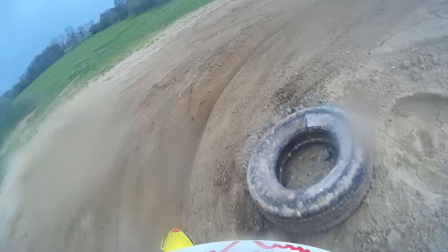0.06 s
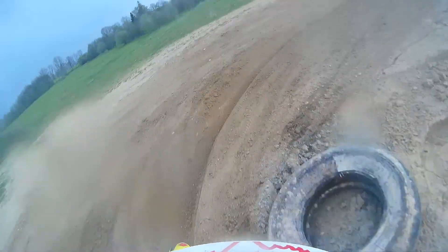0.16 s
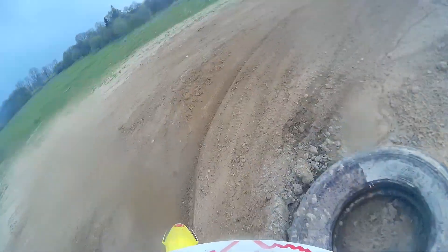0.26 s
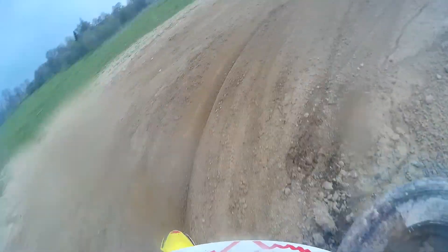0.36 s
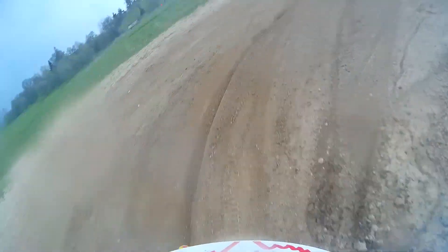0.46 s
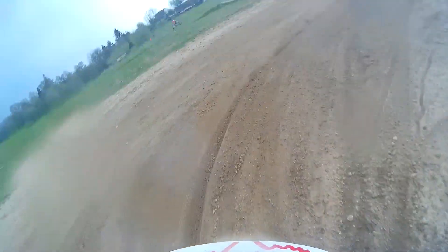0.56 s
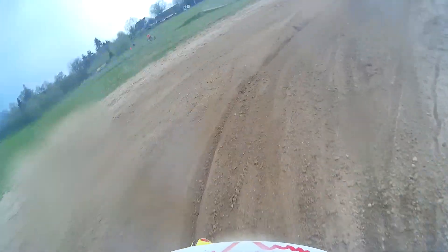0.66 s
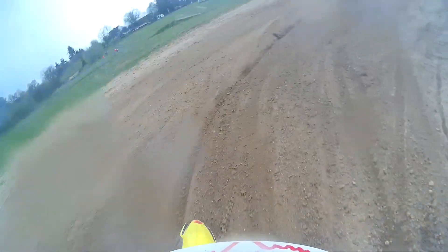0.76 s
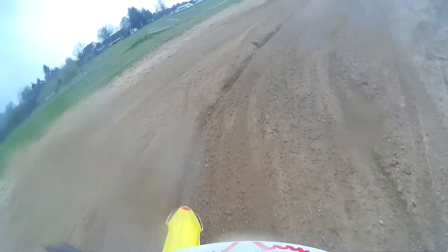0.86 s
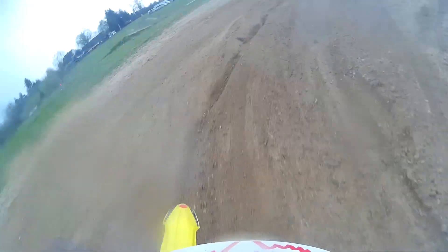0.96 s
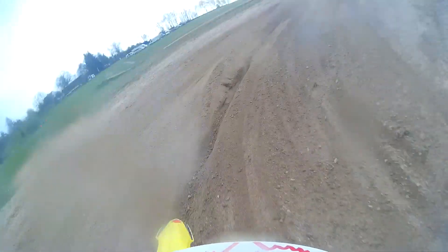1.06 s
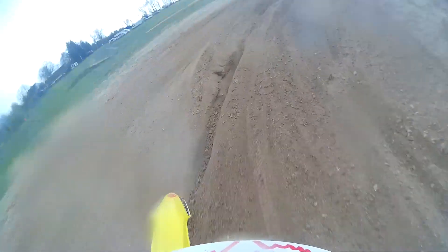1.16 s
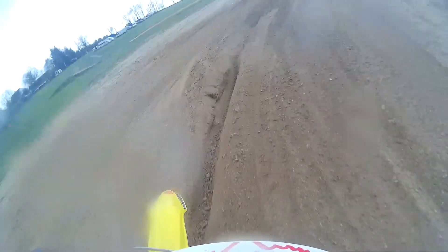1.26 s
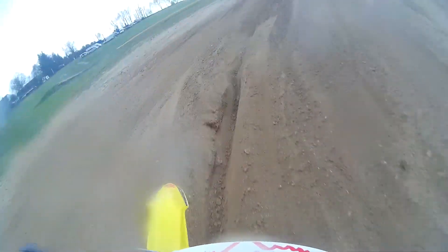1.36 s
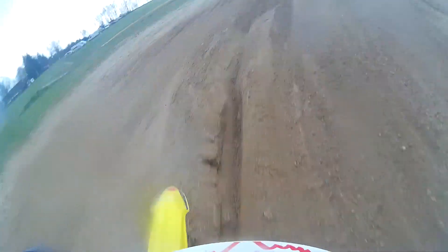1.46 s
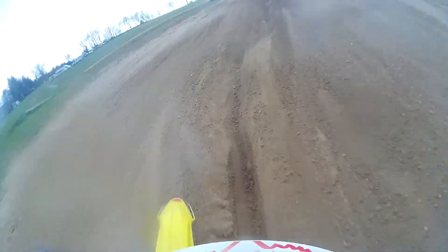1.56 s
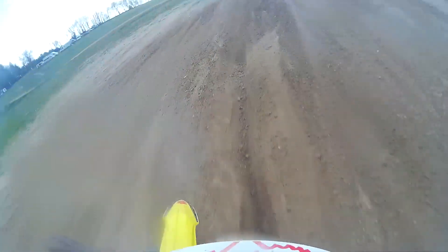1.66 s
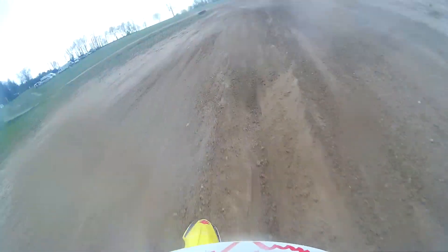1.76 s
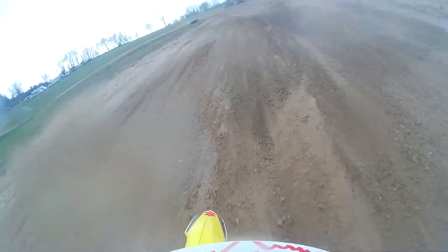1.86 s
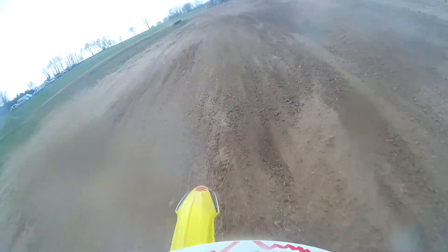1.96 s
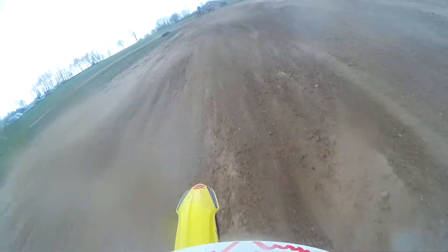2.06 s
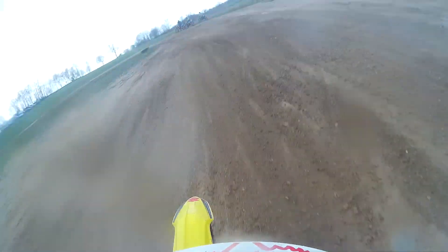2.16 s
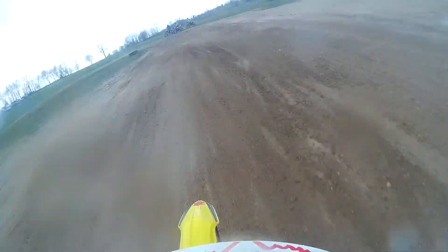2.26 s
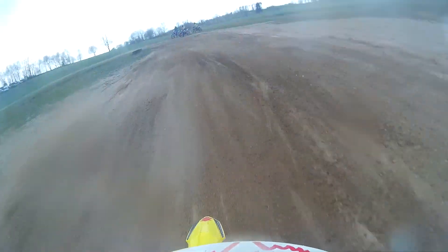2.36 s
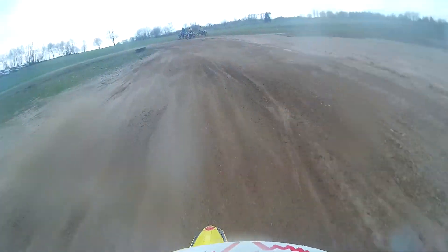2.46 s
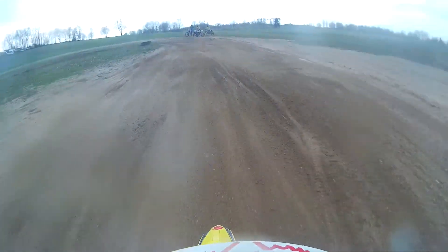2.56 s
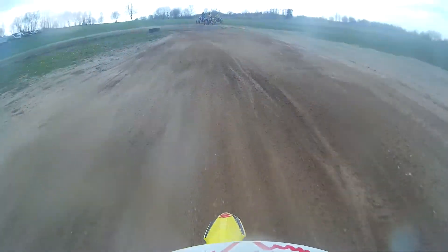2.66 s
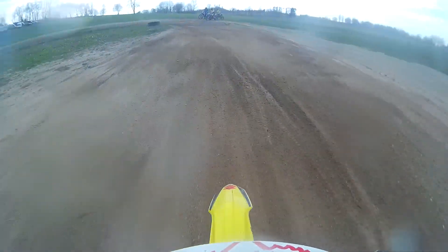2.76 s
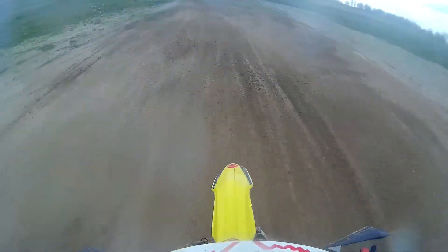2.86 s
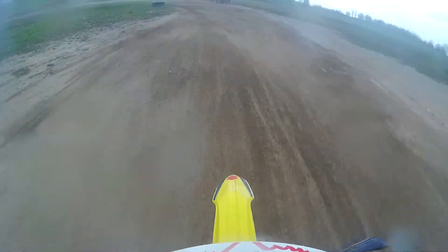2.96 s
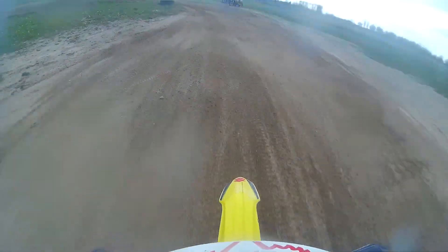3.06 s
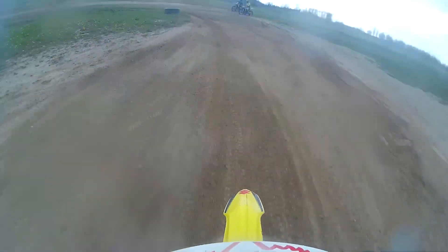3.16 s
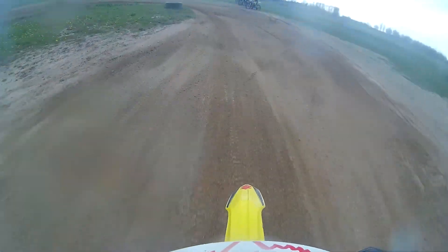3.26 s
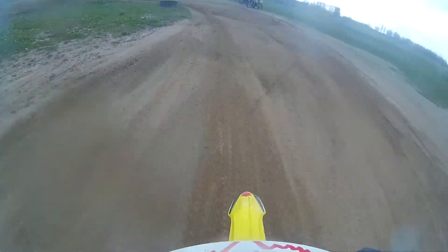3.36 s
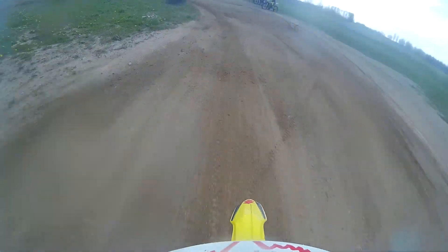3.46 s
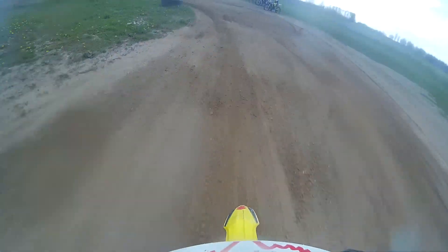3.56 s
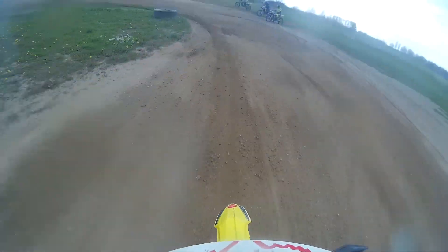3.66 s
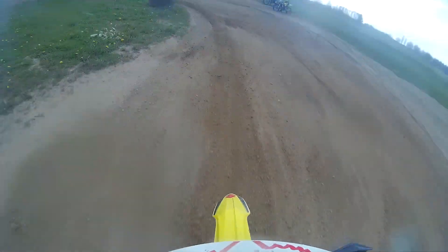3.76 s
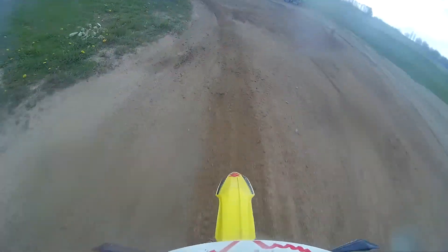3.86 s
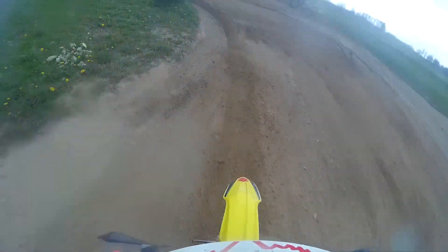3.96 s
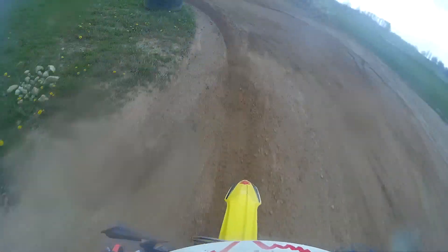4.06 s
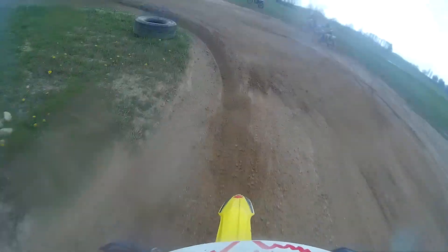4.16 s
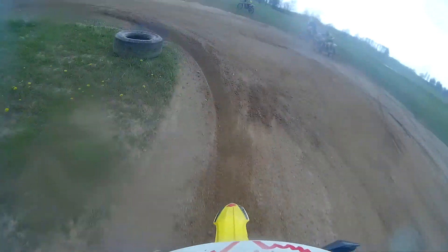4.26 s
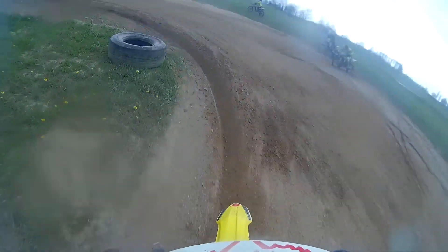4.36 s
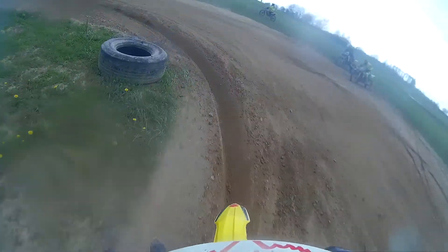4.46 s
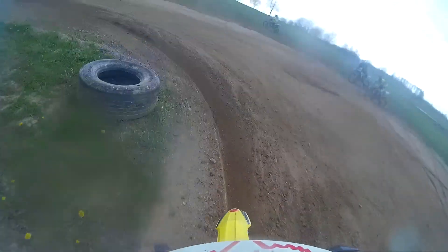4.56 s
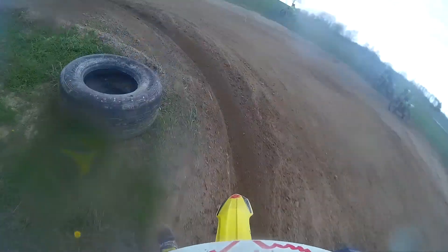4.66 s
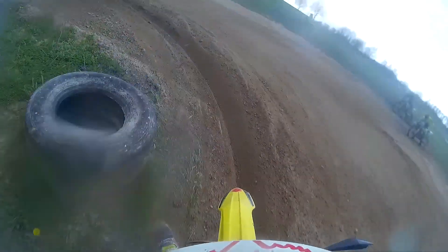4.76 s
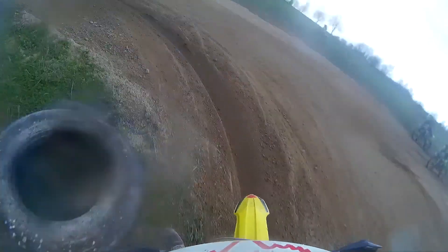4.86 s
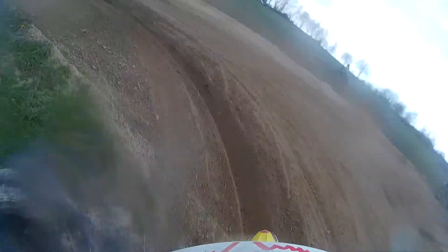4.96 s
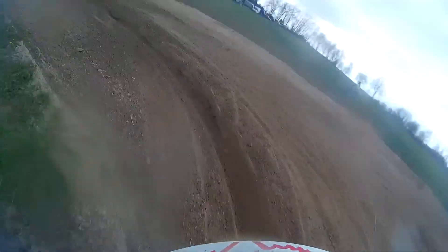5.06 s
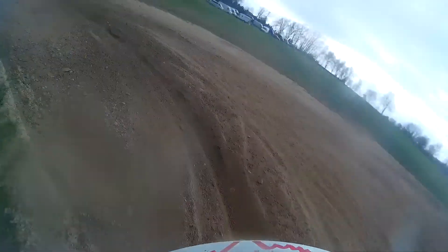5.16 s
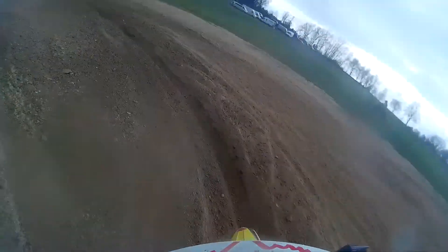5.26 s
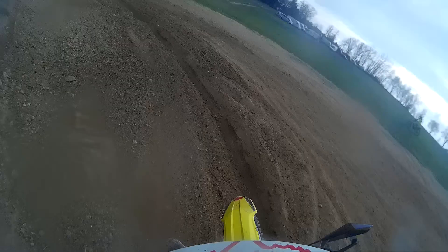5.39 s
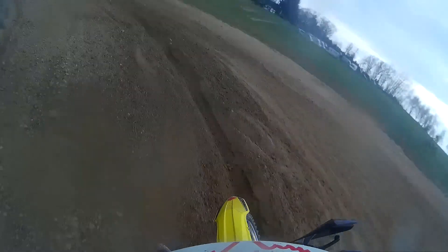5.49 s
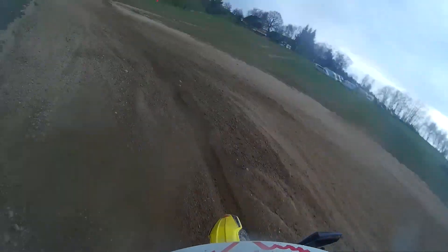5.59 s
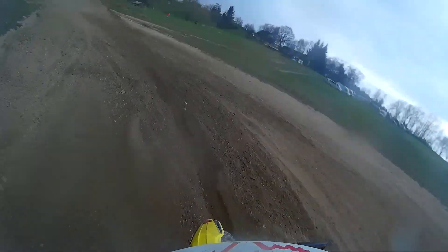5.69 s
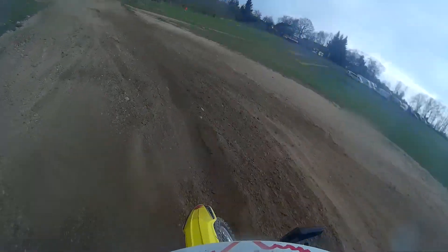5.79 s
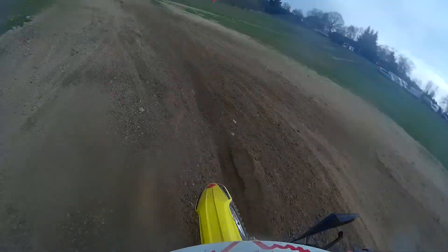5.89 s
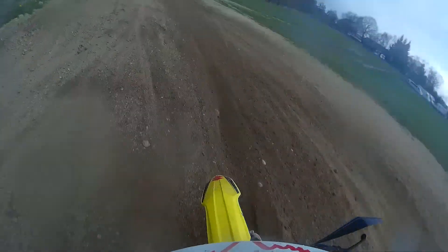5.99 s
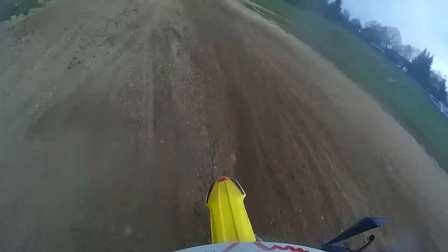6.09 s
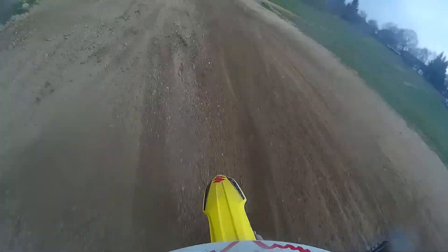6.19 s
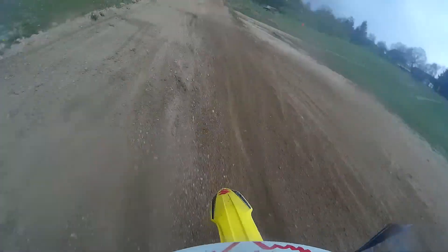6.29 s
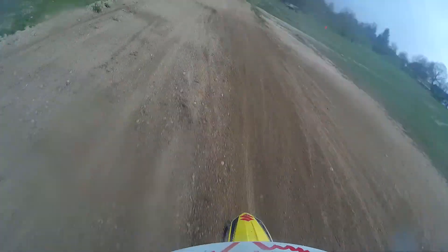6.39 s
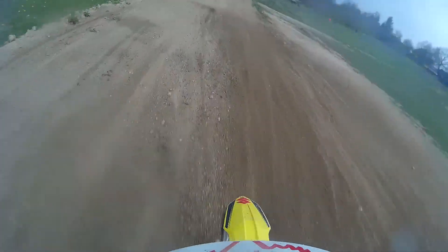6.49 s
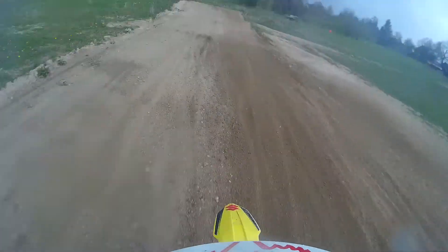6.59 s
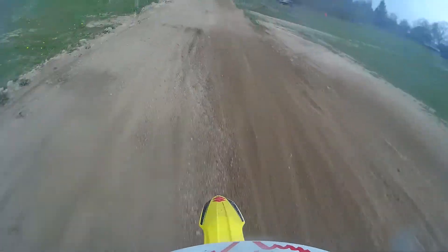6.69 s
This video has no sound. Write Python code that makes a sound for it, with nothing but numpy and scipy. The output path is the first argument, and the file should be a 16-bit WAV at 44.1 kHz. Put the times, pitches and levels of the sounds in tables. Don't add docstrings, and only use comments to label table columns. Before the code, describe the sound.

Close onboard sound of a single-cylinder four-stroke dirt bike on a dirt track, heard through a sealed camera case on the helmet. Quiet uneven putting leaps into a coarse, nasal bark with low boom and valve rattle. Ruts knock the mount. Midway the throttle shuts and the engine slows to soft putts, then it barks open again and a hard landing slams near the end.

```python
import sys
import numpy as np
from scipy import signal
from scipy.fft import rfft, irfft
from scipy.io import wavfile
from scipy.ndimage import uniform_filter1d

SR = 44100
rng = np.random.default_rng(int(sys.argv[2]) if len(sys.argv) > 2 else 0)


def boost(x):
    u = np.asarray(x, float) / 20
    return 10 ** u


def store_pcm(level_fs):
    pcm = np.round(np.clip(level_fs, -1, 1) * 32767).astype(np.int16)
    wavfile.write(sys.argv[1], SR, np.atleast_2d(pcm).T)


N = 296793

# frequency in Hz, density in dB per Hz.
HISS_SPECTRUM = [(2000, 4), (4500, -3.5), (8000, -5), (11000, -5), (14000, -5.5), (15300, -7), (16200, -29)]
# frequency in Hz, level in dB.
WHINE_TONES = [(8624, -84.5), (8694, -90)]
# start in seconds, end in seconds.
CARD_WRITES = [(.53, .77), (1.76, 1.95), (2.53, 2.77), (3.53, 3.69), (3.88, 3.97), (4.53, 4.77),
               (5.53, 5.77), (6.55, 6.73)]
# centre in seconds, extra level in dB, half length in seconds.
WIND_GUSTS = [(.55, 11.5, 0.091), (1.02, 13.5, 0.38), (1.48, 24.5, 0.045), (2.15, 13, 0.063),
              (2.33, 14, 0.045), (2.95, 16, 0.039), (3.65, 19.5, 0.041), (3.81, 7, 0.031), (5.27, 5, 0.12),
              (5.53, 8, 0.078), (5.87, 9, 0.096), (6.08, 10, 0.051), (6.32, 23, 0.16), (6.55, 15.5, 0.089)]
# start in seconds, peak in dB, centre frequency in Hz.
GRIT_TICKS = [(1.4656, -40, 4870), (1.537, -34.5, 5600), (1.5844, -45, 4500), (1.8914, -41, 10700),
              (2.8883, -39, 5730), (3.415, -32.5, 10500), (3.5814, -40, 9470), (3.7314, -50, 1300),
              (3.746, -42, 5430), (3.864, -50, 5560), (3.8964, -44, 7060), (3.9265, -40, 4380),
              (4.925, -44.5, 4600), (6.2741, -20.5, 5140), (6.333, -34, 4500)]
# frequency in Hz, 60 dB decay time in seconds, level in dB.
MOUNT_MODES = [(283, 0.032, 11), (178, 0.0092, -57), (479, 0.023, 2), (806, 0.0085, -3.5)]
# start in seconds, peak in dB, sway below 80 Hz in dB, contact in ms.
MOUNT_KNOCKS = [(0.496, -37, -39.5, 0.69), (0.883, -18.5, -52, 1.6), (1.094, -31, -57, 3.8),
                (1.269, -24.5, -52, 2.1), (1.376, -23.5, -41, 1.7), (1.449, -19.5, -49, 0.79),
                (1.464, -26, -41, 1.8), (1.537, -13, -65, 0.22), (1.588, -26.5, -54, 1.7),
                (1.611, -19.5, -47, 1.6), (2.195, -20, -58, 0.47), (2.944, -28, -70, 1.9),
                (3.633, -21.5, -27, 1.15), (3.729, -29, -30, 0.4), (4.113, -39, -60, 3.3),
                (4.559, -30, -40, 1.5), (4.924, -19.5, -50, 1.04), (4.985, -30, -56, 3.5),
                (5.092, -31, -60, 2.5), (5.363, -39, -55, 3.7), (5.601, -31, -60, 3.0),
                (5.723, -21, -66, 0.53), (5.898, -28, -53, 1.6), (6.11, -19.5, -63, 1.5),
                (6.33, -9.5, -39, 1.5), (6.419, -24.5, -45, 0.82), (6.579, -20.5, -49, 0.95)]
# frequency in Hz, 60 dB decay time in seconds, level in dB.
LANDING_MODES = [(280, 0.019, -16), (510, 0.0092, 4), (690, 0.013, -9.5), (1176, 0.018, -3),
                 (2100, 0.0074, -43)]
# time in seconds, rate in firings per second.
ENGINE_SPEED = [(0.0, 17.87), (0.32, 18.27), (0.585, 40.1), (0.85, 27.1), (1.51, 38.21), (1.571, 36.85),
                (1.739, 49.65), (2.214, 41.38), (2.622, 49.53), (3.205, 46.99), (3.541, 31.7),
                (3.999, 29.7), (4.051, 26.03), (4.778, 20.42), (5.153, 23.19), (5.27, 44.95),
                (5.808, 29.89), (6.73, 49.21)]
# centre in seconds, extra firings per second, half length in seconds.
WHEEL_SLIPS = [(0.67, 2.65, 0.051), (0.93, 3.81, 0.1), (1.145, 3.78, 0.07), (2.571, 2.33, 0.066),
               (2.749, -3.73, 0.047), (3.106, 3.79, 0.068), (5.361, -8.58, 0.111), (5.635, 21.34, 0.113),
               (5.925, 8.18, 0.065), (6.132, 13.69, 0.065), (6.328, 13.07, 0.083), (6.682, 6.51, 0.038)]
# time in seconds, level in dB.
THROTTLE_DB = [(0, -63), (.3, -62.5), (.4, -53.5), (.62, -49), (.73, -40), (1.5, -36.5), (1.9, -41.5),
               (2.17, -39), (2.42, -33), (3.1, -37), (3.25, -51.5), (3.85, -61), (5.17, -61.5), (5.2, -38),
               (5.5, -37), (5.77, -50.5), (5.8, -37.5), (6.73, -39)]
# centre in seconds, extra level in dB, half length in seconds.
WRIST_JERKS = [(.2, 9.5, 0.047), (.36, 8, 0.016), (1.32, -8, 0.032), (1.44, -5.5, 0.039),
               (1.48, 5.5, 0.019), (2.55, 3, 0.016), (2.64, -2, 0.06), (2.84, 4, 0.066), (2.92, -5, 0.065),
               (5.9, 4, 0.023), (5.962, 1.5, 0.011), (6.15, 7.5, 0.058), (6.24, -6, 0.032),
               (6.3, 6.5, 0.036), (6.42, -10, 0.062), (6.66, 5.5, 0.04)]
# centre in seconds, extra level in dB,
# half length in seconds.
TYRE_LOADS = [(.4, 6, 0.054), (.62, -5, 0.098), (1.0, -7, 0.049), (1.29, 6, 0.038), (1.62, 5, 0.12),
              (2.2, 5, 0.22), (2.74, 3.5, 0.055), (5.3, 0, 0.046), (5.62, -8, 0.11), (5.82, 3.5, 0.058),
              (6.02, 6, 0.091), (6.6, 8, 0.044)]
# frequency in Hz, width in Hz, level for bark in dB, level for rattle in dB.
CASE_MODES = [(766, 950, -5.5, -7), (1151.5, 200, 10.5, 12.5), (1397, 114, 1.5, 4.5),
              (1561, 130, -0.5, 5.5), (1797, 368, -3, 6), (2160, 497, 2, -8), (3034, 590, -5, -4.5),
              (4127, 700, -11.5, -66), (5390, 1120, -17, -22), (7500, 1200, -28.5, -58),
              (10000, 2000, -31.5, -29.5)]
# frequency in Hz, width in Hz, level in dB.
PIPE_MODES = [(204.8, 28.5, 5), (264.3, 55, 7.5), (318.2, 26.6, 4.5)]
# frequency in Hz, width in Hz, level in dB.
SILENCER_MODES = [(468.3, 84.4, 4), (640, 50, -17)]
# level at reference in dB, dB per dB of throttle,
# dB per firing per second, level at idle in dB.
BOOM_LAW = (-42.5, 0.66, 0.24, -60.5)
HOOT_LAW = (-44, 0.56, -0.1953, -87)
THROB_LAW = (-51.5, -0.03, 0.17, -64.5)
RATTLE_LAW = (-49.5, 0.23, 0.34, -68.5)

FULL_DB, CRUISE_RATE = -38, 40
LANDING_S = 6.2739


def level(x, db):
    return x * boost(db) / np.sqrt(np.mean(x ** 2))


def curve(table):
    s, value = np.transpose(table)
    return np.interp(np.arange(N) / SR, s, value)


def bumps(table):
    t = np.arange(N) / SR
    return sum(size * np.exp(-((t - s) / half) ** 2) for s, size, half in table)


def walk(rate):
    k = int(SR / rate)
    held = np.repeat(rng.standard_normal(N // k + 1), k)
    return 1.17 * uniform_filter1d(uniform_filter1d(held, k), k)[:N]


def peak(x, hz, width):
    b, a = signal.iirpeak(hz, hz / width, fs=SR)
    return signal.lfilter(b, a, signal.lfilter(b, a, x))


def modes(x, table, flip=True):
    return sum((-1) ** (k * flip) * boost(db) * peak(x, f, w) for k, (f, w, db) in enumerate(table))


def ring(hz, t60, t):
    return np.sin(2 * np.pi * hz * t) * np.exp(-np.log(1000) * t / t60)


def swell(x, rise_ms, fall_ms):
    t = np.arange(SR // 20) / SR * 1000
    rise = (t / rise_ms) ** 2 / (1 + (t / rise_ms) ** 2)
    return signal.fftconvolve(x, rise * np.exp(-t / fall_ms))[:N]


def follow(law, throttle_db, hz):
    db, per_db, per_rate, idle_db = law
    return np.maximum(db + per_db * (throttle_db - FULL_DB) + per_rate * (hz - CRUISE_RATE), idle_db)


def hiss():
    t = np.arange(N) / SR
    f = np.maximum(np.fft.rfftfreq(N, 1 / SR), 1)
    hz, density_db = np.transpose(HISS_SPECTRUM)
    shape = boost(np.interp(np.log(f), np.log(hz), density_db))
    noise = level(irfft(rfft(rng.standard_normal(N)) * shape, N), -66.5)
    busy = uniform_filter1d(sum(1. * ((t > a) & (t < b)) for a, b in CARD_WRITES), SR // 30)
    writing = busy * level(peak(rng.standard_normal(N), 11000, 14000), -74)
    whine = sum(boost(db + 4) * np.sin(2 * np.pi * tone * t + 1.5 * walk(20)) for tone, db in WHINE_TONES)
    return noise + writing + whine


def wind():
    db = -54 + bumps(WIND_GUSTS)
    sway = peak(rng.standard_normal(N), 30.0, 31) + boost(-10.5) * peak(rng.standard_normal(N), 20.6, 21)
    flutter = peak(rng.standard_normal(N), 96, 240) * boost(2.0 * walk(20))
    return boost(db - 7) * (level(sway, 0) + level(flutter, 0))


def grit():
    out, t = np.zeros(N + SR), np.arange(SR // 50) / SR
    noises = rng.standard_normal((len(GRIT_TICKS), len(t)))
    for (s, db, hz), noise in zip(GRIT_TICKS, noises):
        tick = peak(noise * np.exp(-t / 0.00071), hz, 1.35 * hz)
        tick = tick + .5 * peak(noise * np.exp(-t / 0.0035), 3650, 2700)
        i = int(s * SR)
        out[i:i + len(t)] += boost(db) * tick / np.abs(tick).max()
    return out[:N]


def knocks():
    out, t = np.zeros(N + SR), np.arange(SR // 4) / SR
    response = sum(boost(db) * ring(hz, t60, t) for hz, t60, db in MOUNT_MODES)
    for s, db, sway_db, contact_ms in MOUNT_KNOCKS:
        push = np.hanning(max(int(contact_ms / 1000 * SR), 4))
        body = np.convolve(response, push)[:len(t)]
        i = int((s + 0.00244) * SR)
        out[i:i + len(t)] -= boost(db) * body / np.abs(body).max()
        j = i - int(0.0142 * SR)
        out[j:j + len(t)] += boost(sway_db) * ring(31.0, 0.033, t)
    return out[:N]


def landing():
    since = np.arange(N) / SR - LANDING_S
    t = np.maximum(since, 0)
    slam = uniform_filter1d(sum(boost(db) * ring(hz, t60, t) for hz, t60, db in LANDING_MODES), 9)
    heave = ring(43.3, 0.22, np.maximum(since + 0.012, 0))
    return boost(-14.0) * heave - slam


def valve_rattle(turns):
    taps = (1 + 0.15 * np.cos(4 * np.pi * turns)) * boost(2.0 * walk(60)) * rng.standard_normal(N)
    return level(modes(taps, np.array(CASE_MODES)[:, [0, 1, 3]]), 0)


def crank_throb(pulses, turns, hz, shut):
    low_pipe = level(peak(pulses, 141, 62), -4.5) + level(peak(pulses, 83, 49), -5.5)
    throb = shut * low_pipe + (1.3 - shut) * np.sin(4 * np.pi * turns)
    slowing = np.clip(-uniform_filter1d(np.gradient(hz), SR // 4) * SR / 15, 0, 1)
    braking = shut * np.clip((hz - 28) / 6, 0, 1) * slowing
    return throb + braking * (.8 * np.sin(6 * np.pi * turns) + 1.1 * np.sin(8 * np.pi * turns))


def silencer_hoot(pulses, chug, shut):
    return (1.1 - .7 * shut) * level(modes(pulses, SILENCER_MODES), 0) + level(peak(chug, 600, 450), -11)


def pipe_boom(pulses, chug, hz, shut):
    boom = (1.1 - 1.23 * shut) * level(modes(pulses, PIPE_MODES, flip=False), 0)
    boom = boom + shut * level(peak(chug, 242, 121), 0.77)
    return boom + np.clip((31 - hz) / 8, 0, 1) * level(peak(pulses, 296, 40), 1.3)


def gas_blast(pulses, opens, colours, phases):
    puff = swell(pulses, 1.98, 1.13) + boost(-14.5) * swell(pulses, 2.9, 4.4)
    gas = level(puff * rng.standard_normal(N), 0)
    whip, t = np.zeros(N + SR), np.arange(SR // 100) / SR
    envelope = np.exp(-((t - .0032) / .0017) ** 2)
    for i, colour, phase in zip(opens, colours, phases):
        start_hz = 1150 * boost(0.59 * colour)
        crack = np.sin(2 * np.pi * start_hz * t * (1 + 55 * t) + .35 * phase)
        whip[i:i + len(t)] += pulses[i] * envelope * crack
    return gas + level(whip[:N], -3.5)


def exhaust_bark(blast, opens, strengths, hz, shut):
    case = np.array(CASE_MODES)[:, :3]
    treble = boost(-.4 * (hz - 40)) * modes(np.roll(blast, int(.0015 * SR)), case[6:])
    bark = (1.1 - 0.62 * shut) * modes(blast, case[:1]) - modes(blast, case[1:6]) + treble
    cycle = np.searchsorted(opens, np.arange(N), side="right")
    power = np.bincount(cycle, bark ** 2) / np.bincount(cycle)
    strength = np.append(1, boost(2.06 * strengths))
    return bark * strength[cycle] / np.sqrt(power[cycle] + 1e-12)


def engine():
    hz = curve(ENGINE_SPEED) + bumps(WHEEL_SLIPS)
    bark_db = curve(THROTTLE_DB) + bumps(WRIST_JERKS)
    shut = np.clip((-45 - bark_db) / 8, .1, 1)
    boom_db = follow(BOOM_LAW, bark_db, hz) + bumps(TYRE_LOADS)
    hoot_db = follow(HOOT_LAW, bark_db, hz) - 2.5 * np.clip(21.5 - hz, 0, 4)
    throb_db = uniform_filter1d(follow(THROB_LAW, bark_db, hz), SR // 6)
    rattle_db = np.minimum(follow(RATTLE_LAW, bark_db, hz), bark_db - 7 + 8 * shut)

    turns = .206 + np.cumsum(hz) / SR
    at = np.flatnonzero(np.diff(np.floor(turns)))
    unevenness, strengths, colours, phases = rng.standard_normal((4, len(at)))
    opens = np.maximum(at - int(.0049 * SR), 0)
    pulses = np.zeros(N)
    pulses[opens] = boost(2.5 * shut[at] * unevenness) / np.sqrt(hz[at])
    chug = (level(swell(pulses, 2.3, 11.0), 0) + 0.62) * rng.standard_normal(N)

    blast = gas_blast(pulses, opens, colours, phases)
    bark = exhaust_bark(blast, opens, strengths, hz, shut)
    pop = (1.1 - shut) * level(peak(swell(pulses, .3, .15), 880, 600), -14)
    out = bark * boost(bark_db - 1.42 - 5.3 * shut) + pop * boost(bark_db)
    out = out + pipe_boom(pulses, chug, hz, shut) * boost(boom_db - 2.0)
    out = out - silencer_hoot(pulses, chug, shut) * boost(hoot_db - 3.73)
    out = out + crank_throb(pulses, turns, hz, shut) * boost(throb_db - 1.5)
    return out + valve_rattle(turns) * boost(rattle_db + 2.0)


def scene():
    return (hiss() + wind() + grit() + knocks() + landing() + engine())[None]


def top_cut(x):
    return signal.sosfilt(signal.butter(12, 16250, fs=SR, output="sos"), x)


def record(dry):
    lowpass = signal.ellip(8, .2, 70, 15800, fs=SR, output="sos")
    mix = signal.sosfilt(lowpass, np.clip(dry, -.7, .7))
    return top_cut(mix)


dry = scene()
out = record(dry)
store_pcm(out)
```